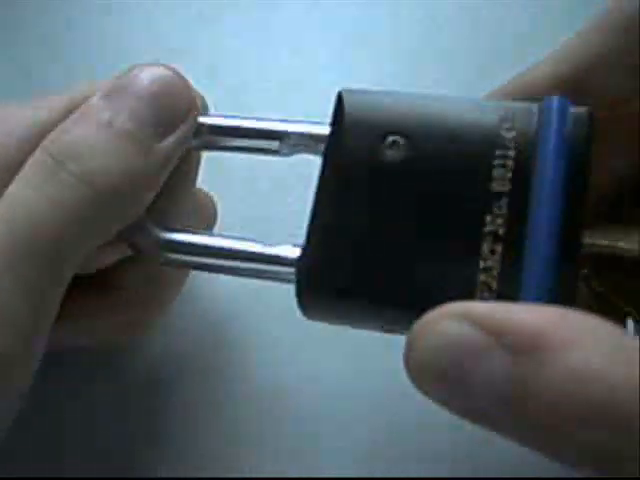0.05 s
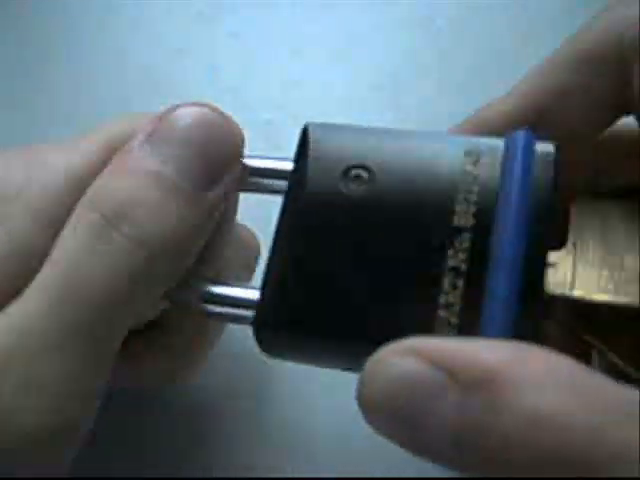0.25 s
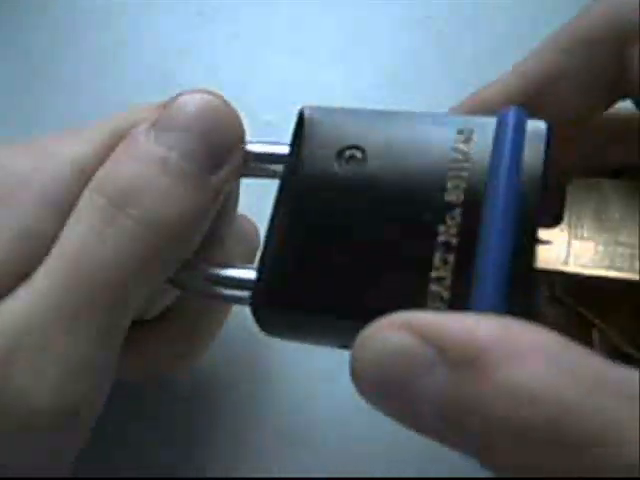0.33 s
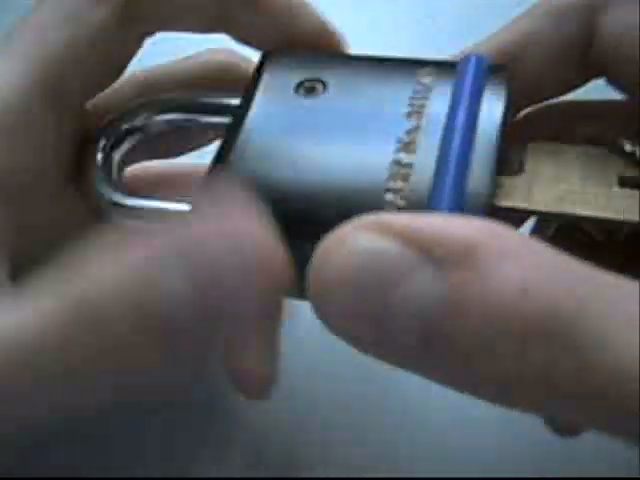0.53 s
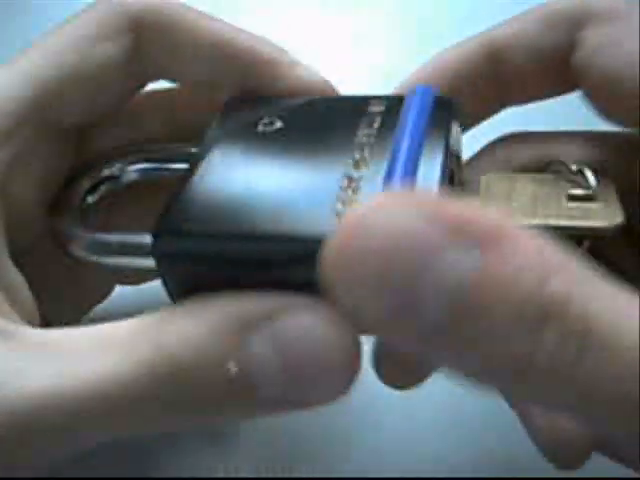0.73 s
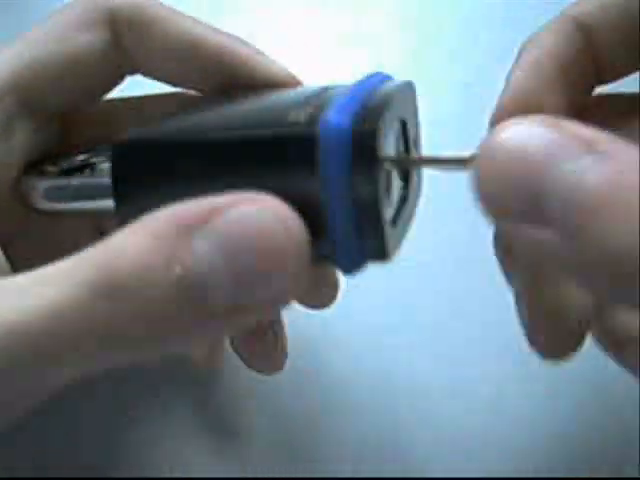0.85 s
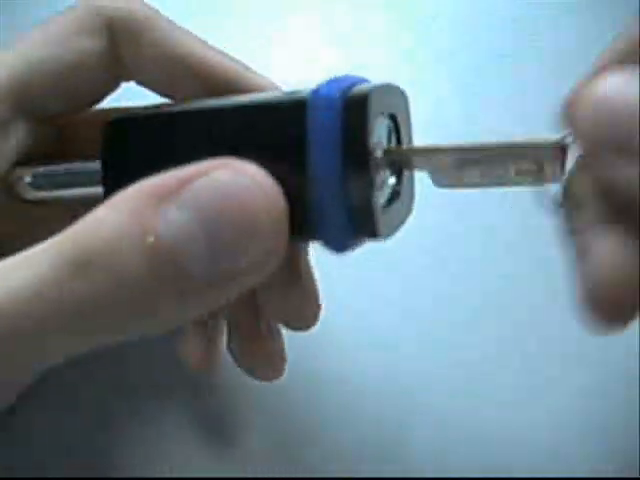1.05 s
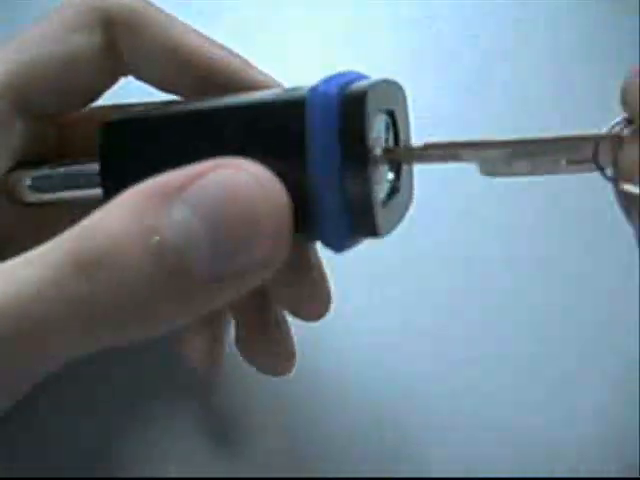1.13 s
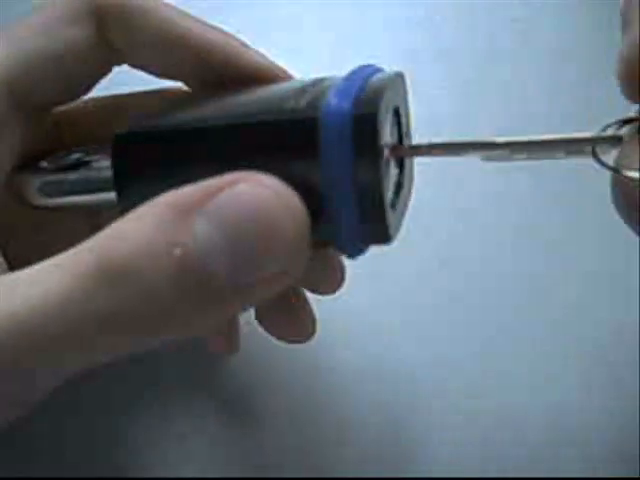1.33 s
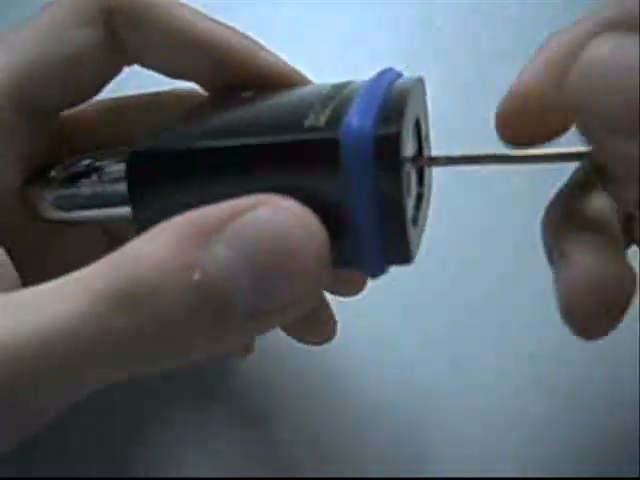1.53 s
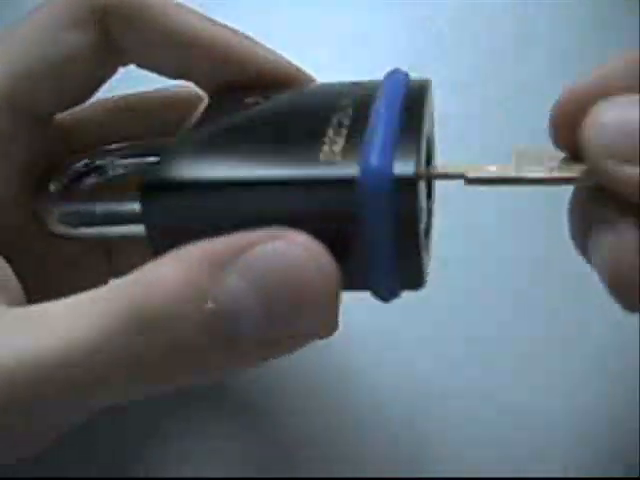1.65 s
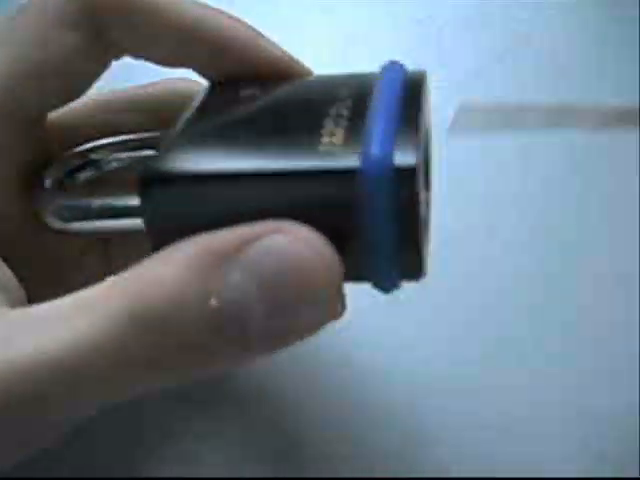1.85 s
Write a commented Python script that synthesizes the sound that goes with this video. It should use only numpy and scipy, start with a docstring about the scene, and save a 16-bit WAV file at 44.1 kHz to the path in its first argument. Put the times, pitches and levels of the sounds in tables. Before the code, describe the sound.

Padlock shackle pushed shut with a sharp double metallic click, then faint key ticks over hiss

```python
"""In a small room, a padlock is pushed shut in the hands, close to a cheap camera microphone.
The shackle knocks on the bolt, scrapes past it and snaps home in a quick rattle: pings, rings and noisy knocks.
The key then ticks faintly as the lock is turned over; the scrape is a stream of tiny random slips.
Coarse sampling mirrors each click into the treble, over a steady hiss of coloured noise."""
import sys
import numpy as np
from scipy import signal
from scipy.fft import rfft, irfft
from scipy.io import wavfile
from scipy.ndimage import map_coordinates

SR = 44100
rng = np.random.default_rng(int(sys.argv[2]) if len(sys.argv) > 2 else 0)


def wrap_up_sound(samples):
    """Save the sound to the file named by the first command line argument, as 16-bit audio."""
    columns = np.atleast_2d(samples).T
    # keep every value between -1 and 1, then stretch to whole-number steps
    tamed = np.clip(columns, -1, 1)
    steps = np.round(tamed * 32767).astype(np.int16)
    wavfile.write(sys.argv[1], SR, steps)


N = 83790  # length in samples
COARSE_RATE = 8000  # samples per second


def undb(db):
    """Turn decibels into a gain."""
    return 10 ** (np.asarray(db) / 20)


def unit(x):
    """Scale a sound to an average (rms) strength of 1."""
    return x / np.sqrt(np.mean(x ** 2) + 1e-18)


def fade(t, t60):
    """Die away exponentially, 60 dB down after t60 seconds."""
    return np.exp(-np.log(1000) * t / t60)


def colour(x, points, rate=SR):
    """Shape the tone by a curve of (frequency [Hz], level [dB]) points."""
    hz, db = np.array(points, float).T
    f = np.maximum(np.fft.rfftfreq(len(x), 1 / rate), 1)
    curve_db = np.interp(np.log(f), np.log(hz), db)
    return irfft(rfft(x) * undb(curve_db), len(x))


def lowpass(x, edge_hz, rate, order):
    """Weaken everything above the edge, without delay."""
    f = np.fft.rfftfreq(len(x), 1 / rate)
    gain = 1 / np.sqrt(1 + (f / edge_hz) ** (2 * order))
    return irfft(rfft(x) * gain, len(x))


def coarse_noise(x):
    """Keep noise below half the coarse sampling rate."""
    return lowpass(x, COARSE_RATE / 2, SR, order=8)


def add(out, start, sound):
    """Mix a sound in at a time in seconds."""
    i = int(round(start * SR))
    part = sound[:max(len(out) - i, 0)]
    out[i:i + len(part)] += part


HISS_DB = -56  # rms level before the output filter
# tone of the microphone hiss: (frequency [Hz], relative level per Hz [dB])
HISS_COLOUR = [(20, 3), (60, -0.5), (150, 0), (350, 2), (700, 2), (1400, 0), (2400, -1.5), (3600, -3),
               (5000, -6.5), (6300, -8.5), (7200, -13.5), (7900, -24)]


def microphone_hiss(length, rate):
    """Steady random noise, shaped like the hiss of the microphone."""
    noise = rng.standard_normal(length)
    return undb(HISS_DB) * unit(colour(noise, HISS_COLOUR, rate))


ROOM_T60_S, ROOM_DB, ROOM_GAP_S = .33, -13, 0.0051  # fade time, echo level, silence before echoes
# tone of the room's echoes: (frequency [Hz], relative level [dB])
ROOM_COLOUR = [(60, 14.5), (400, 4.5), (1300, -1.5), (2200, 7.5), (3200, -1), (3900, 0)]


def room(x):
    """Dense reflections of a small room, as a burst of fading noise smeared over the sound."""
    t = np.arange(SR // 2) / SR
    noise = colour(rng.standard_normal(len(t)), ROOM_COLOUR)
    tail = noise * fade(t, ROOM_T60_S) * (t > ROOM_GAP_S)
    tail /= np.sqrt(np.sum(tail ** 2))
    return undb(ROOM_DB) * signal.fftconvolve(x, tail)[:N]


CONTACT_RISE_S, KNOCK_T60_S = 0.00032, 0.0076
# ringing tones of the lock body: (frequency [Hz], level [dB], fade time t60 [s])
LOCK_MODES = [(1090, -20, .03), (1233, -8.5, 0.025), (1430, -9, 0.045), (2840, -9.5, 0.042),
              (3147, -4, 0.045), (3250, -9.5, 0.044), (3660, 0.5, 0.057)]
# tone of the dull knock: (frequency [Hz], relative level [dB])
KNOCK_COLOUR = [(40, 6.5), (200, -11), (450, 1), (800, -2.5), (1300, 10.5), (1900, 1.5), (2600, -10),
                (3900, -13)]


def strike(contact_hz, t60, ring_db, knock_db):
    """One metal contact: a hand-damped ping, the longer ring of the lock and a noisy knock."""
    t = np.arange(SR // 5) / SR
    ping = np.sin(2 * np.pi * contact_hz * t) * fade(t, t60)
    ring = np.zeros(len(t))
    for hz, db, decay in LOCK_MODES:
        hz_now = hz * (1 + .002 * rng.standard_normal())  # slightly different pitch each time
        ring += undb(db) * np.sin(2 * np.pi * hz_now * t) * fade(t, decay)
    noise = colour(coarse_noise(rng.standard_normal(len(t))), KNOCK_COLOUR)
    knock = .5 * unit(noise) * fade(t, KNOCK_T60_S)
    mix = ping + undb(ring_db) * ring + undb(knock_db) * knock
    return 1.4 * mix * (1 - np.exp(-t / CONTACT_RISE_S))


KEY_HZ, KEY_T60_S, KEY_RING_DB = 3330, 0.0075, -16  # ping pitch, ping fade time, ring of the lock
# key and ring ticks: (time [s], relative level [dB], dull knock [dB])
KEY_TICKS = [(.468, -44, -3), (0.608, -44, -3), (.782, -43, -4), (1.053, -47, -3), (1.131, -34.5, -6),
             (1.136, -37.5, 9.5), (1.139, -43, 5), (1.1646, -34.5, 4), (1.168, -40, -5), (1.176, -39, -11),
             (1.2425, -39, -9), (1.266, -43, -6), (1.340, -42, 7), (1.468, -41, 3), (1.6227, -40, -5),
             (1.6897, -37, -4), (1.703, -40, 6), (1.874, -40.5, 0)]


def key():
    """The key shifts in its slot while the lock is handled, making small metal contacts."""
    out = np.zeros(N)
    for start, db, knock_db in KEY_TICKS:
        add(out, start, undb(db) * strike(KEY_HZ, KEY_T60_S, KEY_RING_DB, knock_db))
    return out


SLIDE_START_S, SLIDE_END_S = 0.228, .307
SLIDE_DB, SLIDE_RATE = -40, 1000  # relative level, average slips per second
# tone of the scrape: (frequency [Hz], relative level [dB])
SCRAPE_COLOUR = [(100, -10), (600, -5), (1250, -7), (2000, -8), (3000, 0), (3600, 6), (3950, -9)]


def slide():
    """Tiny slips of steel on steel, growing as the shackle presses the bolt aside."""
    t = np.arange(N) / SR
    slips = (rng.random(N) < SLIDE_RATE / SR) * rng.standard_normal(N)
    scrape = unit(colour(coarse_noise(slips), SCRAPE_COLOUR))
    # grows over the first half, then stays full until the end
    times = [SLIDE_START_S, (SLIDE_START_S + SLIDE_END_S) / 2, SLIDE_END_S]
    pressure = np.interp(t, times, [.3, 1, 1], left=0, right=0)
    return undb(SLIDE_DB) * pressure * scrape


CONTACT_T60_S = 0.0066  # fade time of the ping
# shackle and bolt contacts:
# (time [s], relative level [dB], ping pitch [Hz], ring of the lock [dB], dull knock [dB])
SHACKLE_CLICKS = [(.2265, -12, 3610, -33, -7), (.2277, -11, 3675, -26, -9.5), (.2638, -26.5, 3450, -11, 6),
                  (.2810, -24, 3250, -10.5, 0), (.2852, -24.5, 3450, -9.5, -4),
                  (.3048, -26.5, 3700, -7, -15), (.3080, -7, 3470, -17.5, -3), (.3101, -10, 3210, -10.5, 1),
                  (.3131, -4.5, 3390, -16.5, -15.5), (.3156, -12.5, 3260, -18, -4.5),
                  (.3173, -15.5, 3020, -28, -3.5), (.3221, -11.5, 3120, -32, -3.5),
                  (.3258, -22, 3150, -12, -8), (.3359, -32.5, 3270, 0, -16), (.4446, -22.5, 3450, -23, -5),
                  (.4463, -25.5, 3340, -42, -9)]


def shackle():
    """The shackle meets the bolt, snaps in, rattles and settles as it is let go."""
    out = np.zeros(N)
    for start, db, hz, ring_db, knock_db in SHACKLE_CLICKS:
        add(out, start, undb(db) * strike(hz, CONTACT_T60_S, ring_db, knock_db))
    return out


def scene():
    """Lock and key, close by, with the room behind them."""
    direct = shackle() + slide() + key()
    return (direct + room(direct))[None]


INPUT_EDGE_HZ, MIRROR_EDGE_HZ, TOP_HZ = 3913, 5260, 15800  # low-pass edges: input, mirror, output
OFFSET = -0.0026  # constant shift of the waveform


def record(dry):
    """Coarse sampling mirrors clicks upward; hiss joins at twice that rate; held samples mirror both again."""
    rate = 2 * COARSE_RATE
    places = np.arange(0, N, SR / COARSE_RATE)
    limited = lowpass(dry[0], INPUT_EDGE_HZ, SR, order=40)
    coarse = map_coordinates(limited, [places], mode="nearest")
    # zeros between the samples create the mirrored treble
    doubled = np.zeros(2 * len(places))
    doubled[::2] = 2 * coarse
    sound = lowpass(doubled, MIRROR_EDGE_HZ, rate, order=16) / 2
    noisy = sound + microphone_hiss(len(sound), rate)
    held = noisy[np.arange(N) * rate // SR]
    output_filter = signal.ellip(8, .2, 70, TOP_HZ, fs=SR, output="sos")
    return signal.sosfilt(output_filter, held)[None] + OFFSET


dry = scene()
out = record(dry)
wrap_up_sound(out)
```